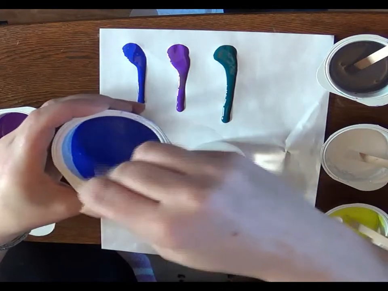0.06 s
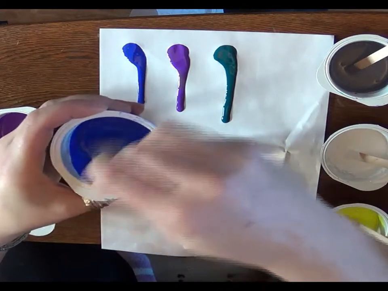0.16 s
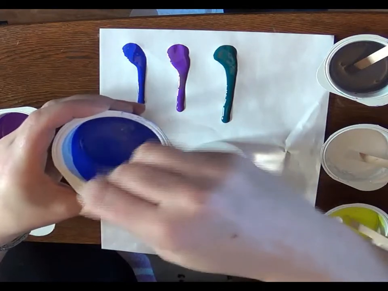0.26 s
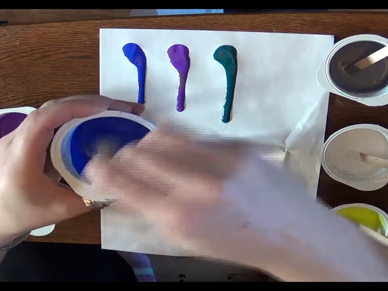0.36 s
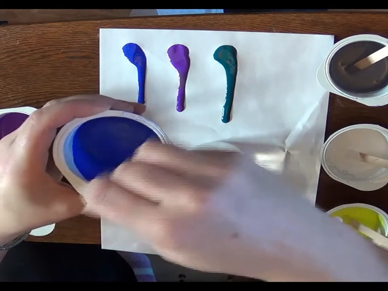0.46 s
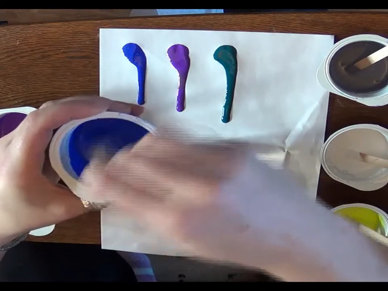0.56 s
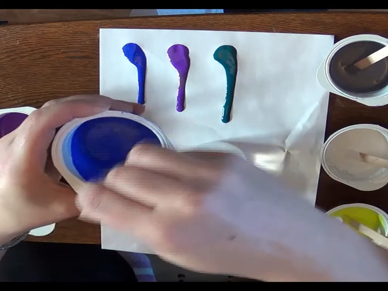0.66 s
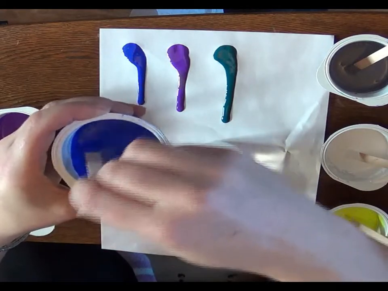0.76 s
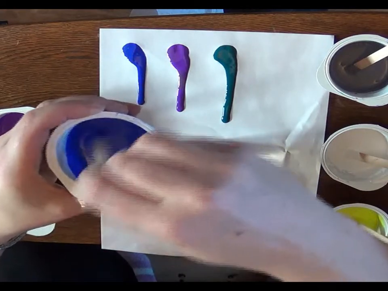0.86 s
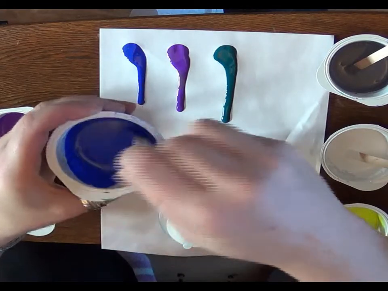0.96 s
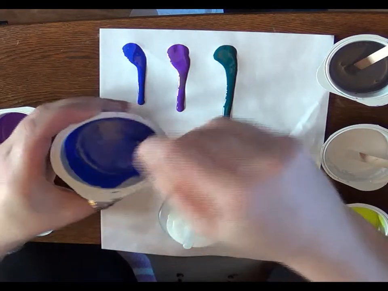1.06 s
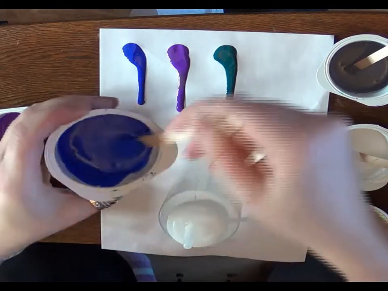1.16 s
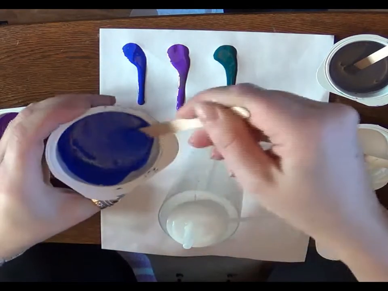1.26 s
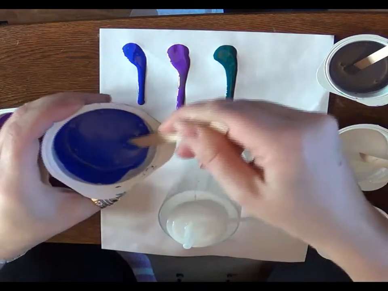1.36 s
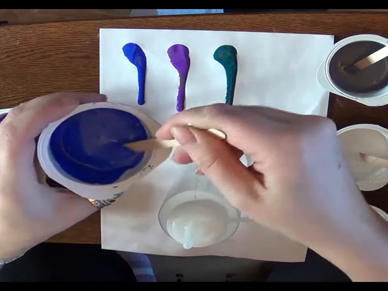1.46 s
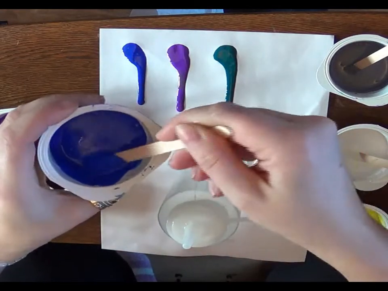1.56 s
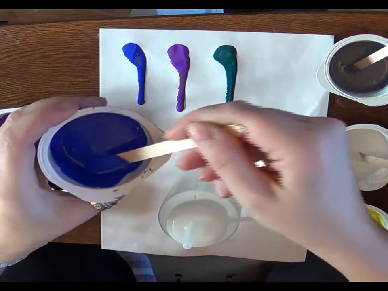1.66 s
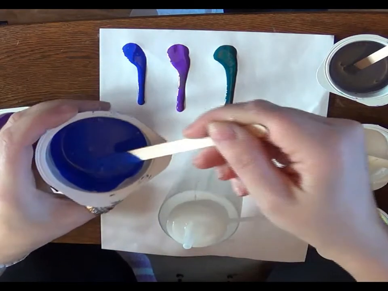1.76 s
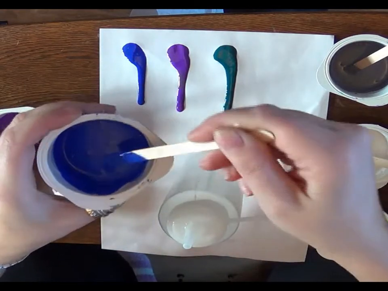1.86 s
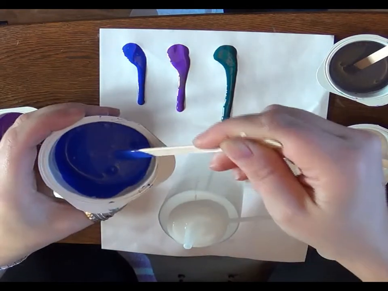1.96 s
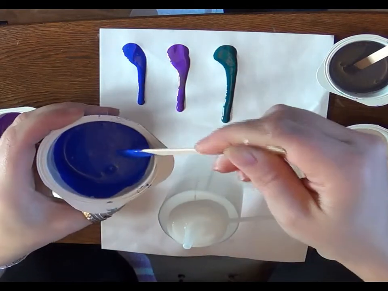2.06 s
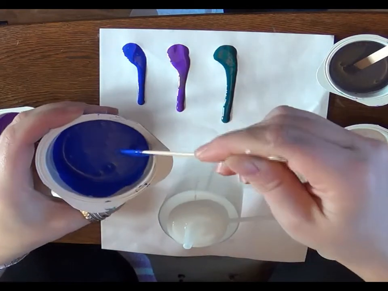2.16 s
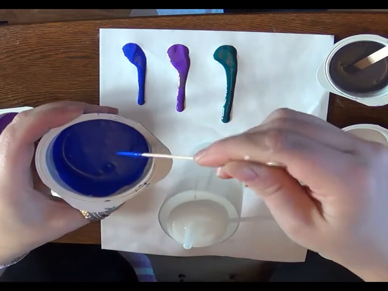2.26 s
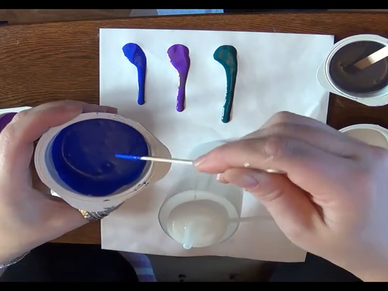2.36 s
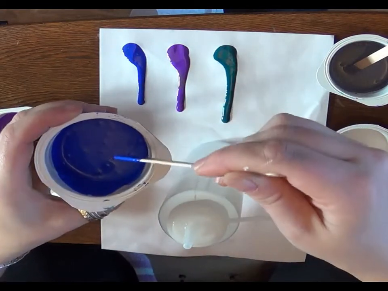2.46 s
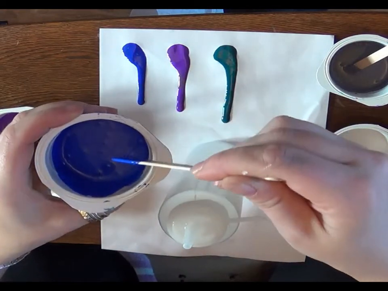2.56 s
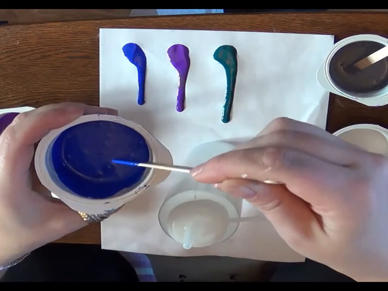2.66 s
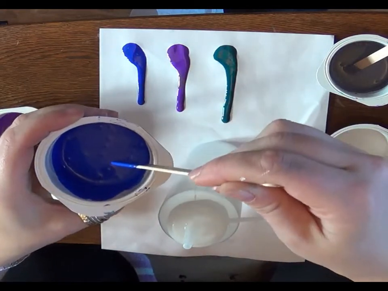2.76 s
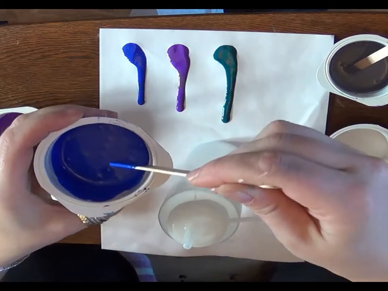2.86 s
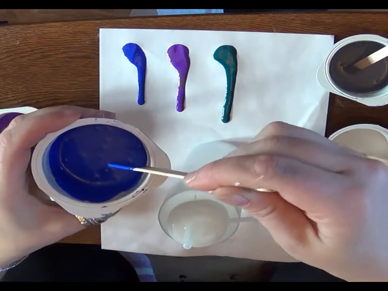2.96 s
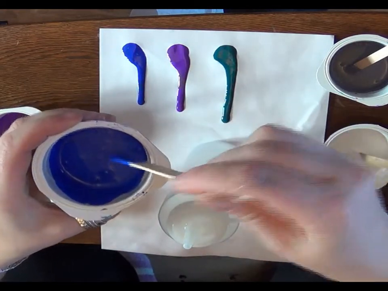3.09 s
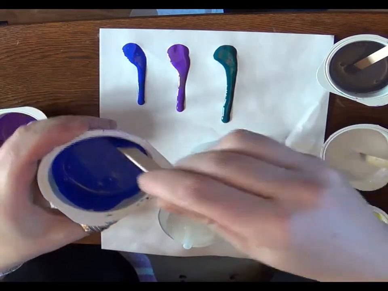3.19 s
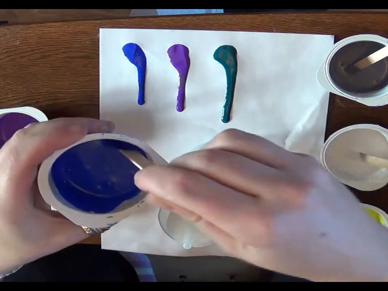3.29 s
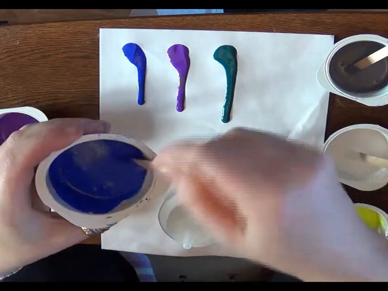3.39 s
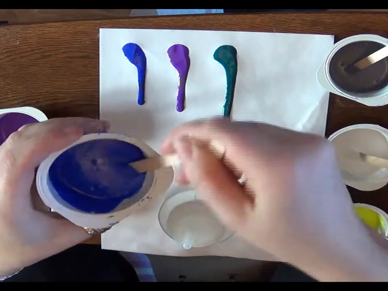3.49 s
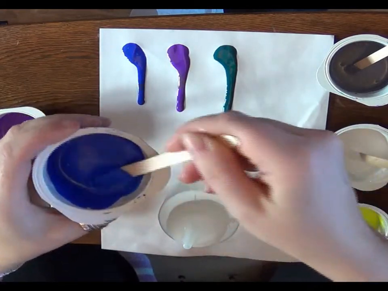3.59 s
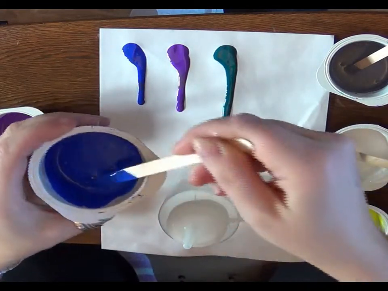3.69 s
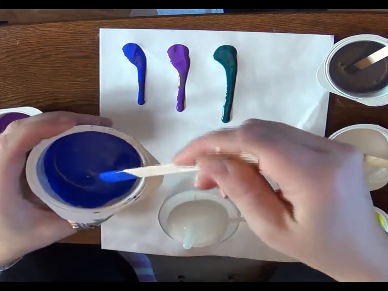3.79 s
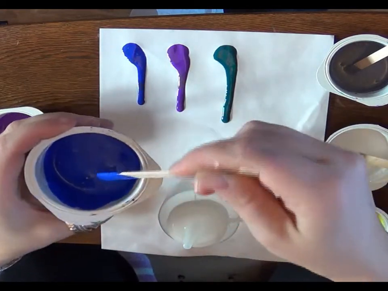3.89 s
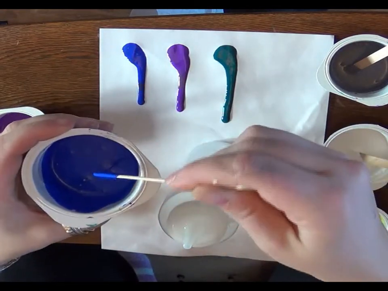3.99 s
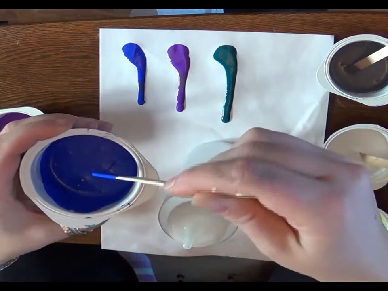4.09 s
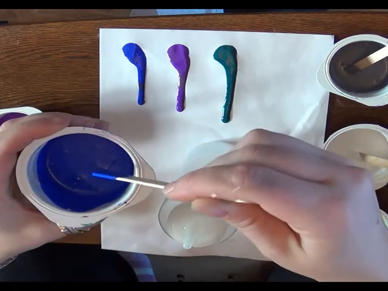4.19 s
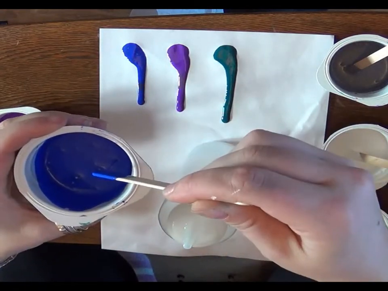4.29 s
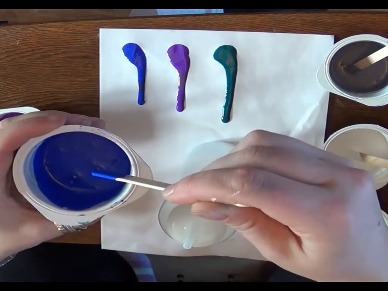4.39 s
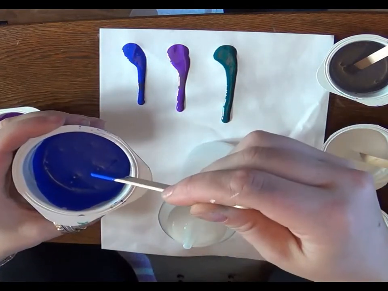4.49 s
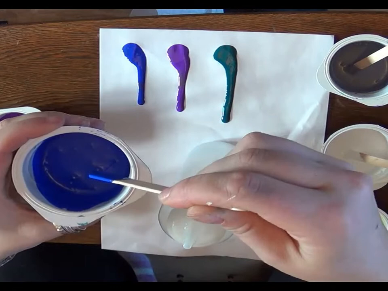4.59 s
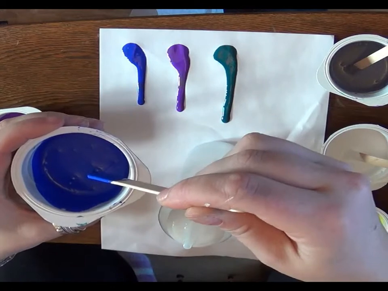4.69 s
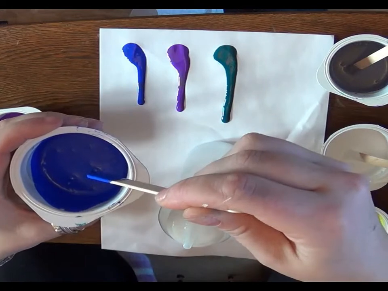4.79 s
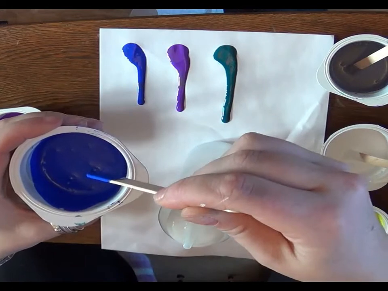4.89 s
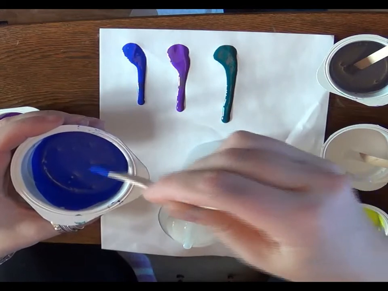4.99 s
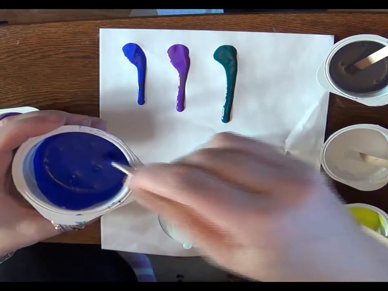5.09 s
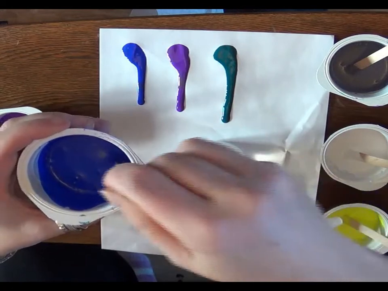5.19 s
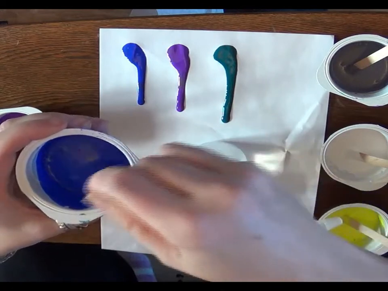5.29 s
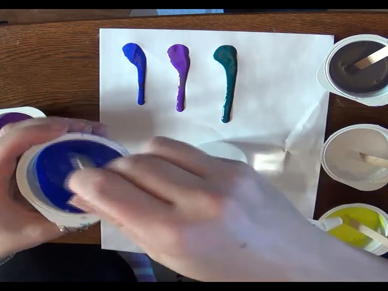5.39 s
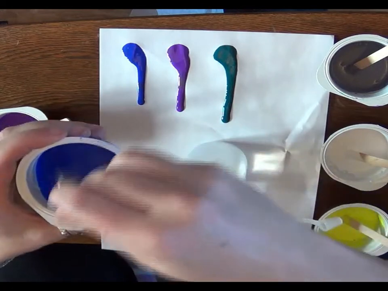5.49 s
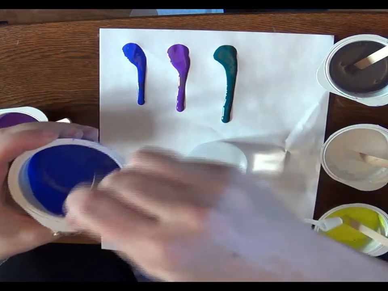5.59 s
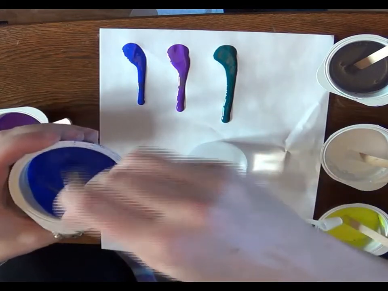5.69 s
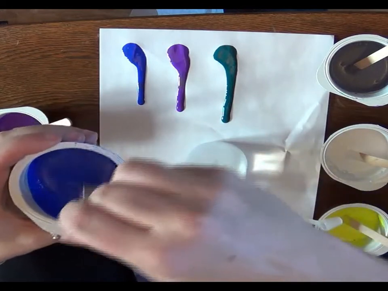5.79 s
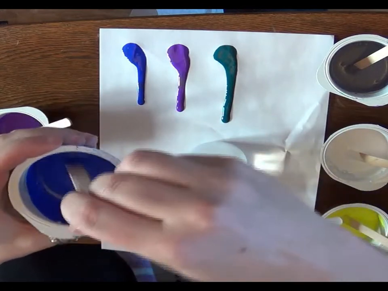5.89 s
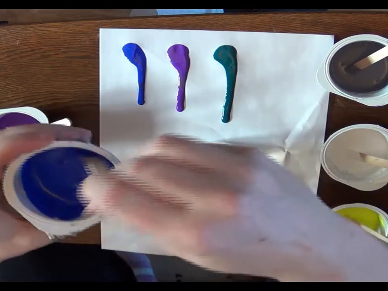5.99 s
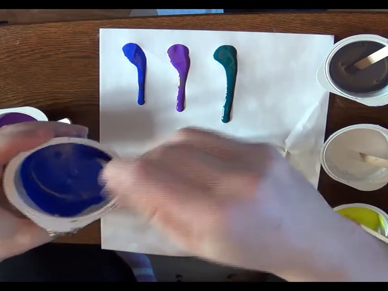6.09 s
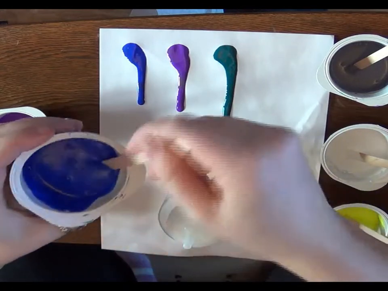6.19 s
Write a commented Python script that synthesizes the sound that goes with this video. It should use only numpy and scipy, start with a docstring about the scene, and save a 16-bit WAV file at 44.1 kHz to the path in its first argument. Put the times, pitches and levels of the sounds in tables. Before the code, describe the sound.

Close up in a small quiet room, a wooden stick rapidly stirs thin paint in a hand-held plastic pot, with raspy scrapes, hollow knocks and small wet glugs at the start. A sharp clap on the rim ends the main stirring, followed by a few soft scrapes. After a quiet pause comes a brief scrape, another pause, then fresh stirring to the end. Faint hiss, hum and a distant clock remain.

```python
"""A wooden stick stirs thin paint in a hand-held plastic pot: it scrapes, knocks the wall, and early glugs rise.
It claps once on the rim and rests, scrapes briefly, rests again, then stirs anew with a few late glugs.
Scrapes are random slips rung through pot and stick; knocks and the clap are noise bursts with decaying modes.
A moving resonance sings the wall's note, and a delayed, inverted bounce off the table colours the scraping.
All along, the small quiet room holds hiss, hum, a thin whine and a far clock made of decaying noise each second."""
import sys
import numpy as np
from scipy import signal
from scipy.fft import rfft, irfft, next_fast_len
from scipy.io import wavfile
from scipy.ndimage import uniform_filter1d, map_coordinates

SR = 44100
rng = np.random.default_rng(int(sys.argv[2]) if len(sys.argv) > 2 else 0)


def digitize_waveform(pressure):
    """Quantize a signal to 16-bit integers and store it at the path in sys.argv[1].

    Rows of a 2-D input are taken as channels; values are limited to [-1, 1].
    """
    field = np.atleast_2d(pressure).T
    bounded = np.clip(field, -1, 1)
    quanta = np.round(bounded * 32767).astype(np.int16)
    wavfile.write(sys.argv[1], SR, quanta)


N = 275625
TIME = np.arange(N) / SR
TOP_HZ = 15900
PAD = SR // 200  # 5 ms of silence at each end of a blow, where the filters settle

# lower edges of the four registers: pot bottom, pot wall, wood rasp, fine hiss [f/Hz]
BAND_EDGES = (70, 1100, 3200, 10500)
REGISTERS = [signal.butter(5, band, "band", fs=SR, output="sos")
             for band in zip(BAND_EDGES, BAND_EDGES[1:] + (TOP_HZ,))]


def undb(db):
    """Decibels to gain."""
    return 10 ** (np.asarray(db) / 20)


def unit(x):
    """Scale to rms 1."""
    return x / np.sqrt(np.mean(x ** 2))


def fade(t, t60):
    """Free decay by 60 dB in t60 seconds."""
    return np.exp(-np.log(1000) * t / t60)


def add(track, start, sound):
    """Mix a sound into a track from a given time on."""
    i = int(round(start * SR))
    lo, hi = max(i, 0), min(i + len(sound), N)
    track[lo:hi] += sound[lo - i:hi - i]


def colour(x, points):
    """Filter by a spectrum of (Hz, dB) points, joined along log frequency."""
    hz, db = np.transpose(points)
    size = next_fast_len(x.shape[-1])
    f = np.maximum(np.arange(size // 2 + 1) * SR / size, 1)
    gain = undb(np.interp(np.log(f), np.log(hz), db))
    return irfft(rfft(x, size) * gain, size)[..., :x.shape[-1]]


def registers(x):
    """Split into pot bottom, pot wall, wood rasp and fine hiss, each of rms 1."""
    return [unit(signal.sosfilt(sos, x)) for sos in REGISTERS]


def walk(size, rate):
    """Smooth random wander with a spread near 1, heading for a new value `rate` times a second."""
    k = int(SR / rate)
    steps = np.repeat(rng.standard_normal(size // k + 1), k)
    return unit(uniform_filter1d(steps, k))[:size]


def scraping():
    """All strokes of the stick along the wall, with their bounce off the table."""
    # strokes along the wall [start t/s, length t/s, rasp level before pressure/dB, swell from start to end/dB,
    # pot wall over rasp/dB, fine hiss over rasp/dB, wall note over the rest of the wall's ring/dB]
    strokes = [(0, 0.048, -34, -21.5, -5, -5.5, -12), (0.029, 0.014, -30, -4, -6, -8, -10),
               (0.048, 0.034, -37.5, 0, 0, -8, -14), (0.08, 0.081, -33, 0, -8, -7, -3),
               (0.168, 0.048, -38, 5, -5, -5, -5), (.203, 0.027, -32.5, -2, -6, -7, -8),
               (0.236, 0.041, -34.5, 5, -10, -11, 1), (0.279, 0.05, -32.5, 4, -12.5, -5, 1),
               (0.332, 0.05, -38.5, -12, -8.5, -6, -2), (0.375, 0.025, -36, 9.5, -9, -4, -4),
               (0.409, 0.034, -39.5, 9, -7.5, -11, -3), (0.445, 0.012, -31.5, 3, -8, -8, 0),
               (0.477, 0.059, -32, -1.5, -8.5, -6.5, -8), (0.533, 0.042, -39.5, 12, -11.5, -7, -8),
               (0.63, 0.043, -39, -8, -8, -9, -10), (0.673, 0.085, -35, -8, -10.5, -5, -6),
               (0.772, 0.033, -32, -8, -5, -11, -11), (0.829, 0.031, -34, -2, -10.5, -12, 9),
               (0.928, 0.18, -37, -2, -9, -6, -8), (0.957, 0.046, -40.5, -1, -18, -8, -3),
               (1.114, 0.052, -36.5, -9, -6, -14, -12), (1.188, 0.03, -40, 7, -6.5, -14, -5),
               (1.317, 0.054, -46.5, -3, -5, -19, -6), (1.368, 0.039, -34.3, 13, -5, -20, -3),
               (1.413, 0.098, -41.5, -17, -7.5, -15, -6), (1.533, 0.077, -47.5, -1, -4.5, -8, -8),
               (3.308, 0.12, -42, 9, -7, -3, 1), (3.438, 0.045, -38, -2, -1, -6, 4),
               (3.479, 0.069, -37.8, 0, -7, -10, -6), (3.549, 0.082, -40, 0.5, -5.5, -8, -7),
               (5.179, 0.039, -37.5, 9.5, -4, -23, -11), (5.221, 0.052, -38, -6, -6, -16, -11),
               (5.275, 0.022, -36.3, 4, -2.5, -13, -24), (5.298, 0.11, -39, -2, -8, -12, -7),
               (5.428, .047, -43, 14, -0.5, -12, 4), (5.548, 0.056, -37.5, 2.5, -8.5, -2, -7),
               (5.606, 0.035, -35, -5, -9.5, -5.5, -9), (5.649, 0.081, -43.5, -2, -6, -6.5, -13),
               (5.743, 0.073, -37.5, 6, -10, -7, -3), (5.824, 0.034, -33.5, 14.5, -16.5, -3.5, 6),
               (5.876, 0.022, -35.5, -2, -5.5, -10, -7), (6.043, 0.12, -41.5, 0.5, -1.5, -6.5, -1),
               (6.148, 0.02, -37.5, -3, -5, -4, -6), (6.162, 0.011, -32.5, -0.5, -6, -15, -2),
               (6.179, 0.016, -33.5, -3, -2.5, -8, 1), (6.199, 0.029, -34.3, -3, -4.5, -12, -6),
               (6.232, .018, -34.5, -7, -4, -14, 1)]
    out = np.zeros(N)
    for start, *shape in strokes:
        add(out, start, stroke(start, *shape))
    return table_bounce(out)


def stroke(start, length, rasp_db, swell_db, ring_db, hiss_db, note_db, slip_rate=9000, chatter_rate=170,
           chatter_db=0.6, pressed_t60=0.014, direct_db=29, stick_db=7, stick_t60=0.0055, note_width_hz=160,
           waver=.022, waver_rate=25, bottom_db=-17, even_hiss_db=-5, tilt=0.2):
    """Wood fibres catch and let go thousands of times a second while the pressure swells and eases."""
    # colour of the slips of wood on wet plastic [f/Hz, level/dB]
    slip_colour = [(80, 12), (200, 4.5), (400, -0.5), (700, 2.5), (1000, 4), (1500, 3.5), (2300, 1),
                   (3000, 2.5), (3450, -1.5), (3900, 3), (4600, 2.5), (5100, 2.5), (7000, 2.5), (10000, 3),
                   (13000, 6), (14200, 2), (16000, -4)]
    # note of the rubbed wall, lower as the stick is lifted; one curve per spell of stirring [t/s, f/Hz]
    wall_pitch = [
        [(0.0, 2340), (0.9, 2300), (1.34, 2060), (1.4, 1640), (1.46, 2280)],
        [(3.32, 2250), (3.475, 2180), (3.51, 1910), (3.62, 1760)],
        [(5.19, 2370), (5.75, 2270), (6.06, 2150), (6.24, 2260)],
    ]
    t = TIME[:SR // 4]
    slips = (rng.random(len(t)) < slip_rate / SR) * np.sign(rng.standard_normal(len(t)))
    slips = colour(slips * undb(chatter_db * walk(len(t), chatter_rate)), slip_colour)

    lag = TIME[:SR // 30]
    body = pot_ring(lag, detune=0.012, scatter_db=1.0) * fade(lag, pressed_t60)  # the pressing stick damps the pot
    body[0] += undb(direct_db)  # part of each slip radiates straight from the contact
    rung = signal.fftconvolve(slips, body)[:len(t)]
    rung = rung + undb(stick_db) * sliding_wood(slips, stick_t60)
    rung = colour(rung, [(3500, 0), (11000, 2 * tilt * (hiss_db - even_hiss_db))])  # wet wood is duller
    bottom, wall, rasp, hiss = registers(rung)

    # the wall sings at the height of the contact; the pitch wavers as the contact travels round the pot
    note_hz = np.interp(start + t, *np.vstack(wall_pitch).T) * (1 + waver * walk(len(t), waver_rate))
    note = unit(signal.sosfilt(REGISTERS[1], resonate(slips, note_hz, note_width_hz)))
    wall = unit(wall_colour(wall, belly_db=-7.0, upper_db=0) + undb(note_db) * note)
    mix = undb(bottom_db) * bottom + undb(ring_db) * wall + rasp + undb(hiss_db) * hiss
    return undb(rasp_db) * pressure(t, length, swell_db) * mix


def pressure(t, length, swell_db, grip_s=0.007, let_go_s=0.0085, arch_db=1, tremor_db=0.8, tremor_rate=71):
    """The stick grips, drags with a force that arches as it grows or fades, and lets go."""
    grip = np.clip(t / grip_s, 0, 1)
    along = np.minimum(t / length, 1)
    swell = swell_db * (along - .5)
    arch = arch_db * (np.sin(np.pi * along) - 2 / np.pi)  # hardest in the middle
    tremor = tremor_db * walk(len(t), tremor_rate)  # the hand's pressure changes
    release = np.exp(-np.maximum(t - length, 0) / let_go_s)
    return grip * undb(swell + arch + tremor) * release


def pot_ring(t, detune, scatter_db, supple_hz=6000):
    """The pot's answer to one tap; the place of contact weights its modes and shifts the high ones most."""
    # modes of pot and stick, damped by hand and paint [nominal f/Hz, t60/s, level/dB]
    pot_modes = [(450, 0.023, -13), (611, 0.033, -9), (808, 0.015, -7.5), (1178, 0.037, -2),
                 (1374, 0.015, -3), (1665, 0.035, -22), (1918, 0.024, -2.5), (2283, 0.027, -1),
                 (2480, 0.014, -9.5), (2880, 0.023, -13.5), (3740, 0.0066, -6), (4140, 0.039, -6),
                 (4480, 0.018, -5.5), (5450, 0.017, -5), (6200, 0.02, -6.5), (6680, 0.04, -11),
                 (7300, 0.022, -5), (8370, 0.021, -7), (9340, 0.038, -7), (12900, 0.004, 10.5)]
    hz, t60, db = np.transpose(pot_modes)[:, :, None]
    shift, weight, phase = rng.standard_normal((3, len(pot_modes), 1))
    hz = hz * (1 + detune * shift * np.minimum(hz / supple_hz, 1))
    modes = fade(t, t60) * np.sin(2 * np.pi * (hz * t + phase))
    return np.sum(undb(db + scatter_db * weight) * modes, axis=0)


def sliding_wood(slips, t60, count=6, slide_rate=45):
    """The stick's dense modes blend from spot to spot as the contact slides, so the colour keeps shifting."""
    lag = TIME[:SR // 100]
    spots = rng.standard_normal((count, len(lag))) * fade(lag, t60)
    share = np.array([walk(len(slips), slide_rate) for _ in spots])
    rung = signal.fftconvolve(slips[None], spots, axes=1)[:, :len(slips)]
    return np.sum(share * rung, axis=0) / np.linalg.norm(share, axis=0)


def resonate(x, hz, width_hz):
    """One resonance whose pitch may move: shift the sound down to 0 Hz, smooth it, shift it back."""
    turn = np.exp(2j * np.pi * np.cumsum(hz) / SR)
    smooth = signal.lfilter([1], [1, -np.exp(-np.pi * width_hz / SR)], x / turn)
    return np.real(turn * smooth)


def wall_colour(x, belly_db, upper_db):
    """The wall is soft at the belly, stiff near the rim; the contact's height weights its low and high modes."""
    return unit(colour(x, [(1400, belly_db), (1650, 0), (2450, 0), (3200, upper_db)]))


def table_bounce(x, sway_rate=9):
    """The pot's underside sounds in opposite phase and returns from the table; the comb shifts with the hands."""
    # bounce off the table [t/s, lag/ms, strength 0-1, sway of the lag/ms]
    bounce = [(0.0, .85, .16, .12), (1.1, .82, .18, .1), (1.5, 1.12, .18, .04), (3.3, 1.17, .22, .01),
              (3.63, 1.155, .22, .015), (5.2, 1.2, .18, .05), (6.2, 1.1, .16, .12)]
    s, lag_ms, strength, sway_ms = np.transpose(bounce)
    sway = np.interp(TIME, s, sway_ms) * walk(N, sway_rate)
    lag_s = (np.interp(TIME, s, lag_ms) + sway) / 1000
    gain = np.interp(TIME, s, strength)
    returned = map_coordinates(x, [(TIME - lag_s) * SR], order=3)
    return (x - gain * returned) / np.sqrt(1 + gain ** 2)


def knocking(crack_t60=0.028, crack_db=5, snap_t60=0.0039, snap_db=15, hiss_db=-17, touch_s=0.00015,
             top_db=-4, dulling=0.63, spot_db=-3, spot_t60=0.035):
    """The stick meets the wall: a snap, a short crack, the ring of the pot and the note of the struck spot."""
    # knocks on the pot [t/s, wall level over 10 ms/dB, cushioning by paint/dB, pitch of the struck spot f/Hz,
    # belly modes/dB, bottom thump over wall/dB]
    knocks = [(.018, -38, 9, 1520, 20, 6), (.072, -33.5, 10, 2305, -7, -21),
              (0.1817, -34, 5.5, 1384, 2, -9), (0.284, -38.5, -2, 1286, -7, -4),
              (.3, -37, 6, 2300, -17, -13), (0.3703, -33.5, 2, 1890, 6, -8),
              (0.4247, -37.5, 8, 1830, -2, -9), (0.456, -43, -3, 2280, -6, -10),
              (.468, -40, 10, 2300, 0, -5.5), (0.6258, -32, 0, 2420, -1, -9),
              (0.6777, -44, -6, 2230, -5, -14), (0.764, -32, 3, 1400, 4, -11.5),
              (.871, -29.5, 0, 2287, -5, -7.5), (0.9647, -40, -9.5, 2260, -10, -30),
              (1.431, -38.5, 15, 2150, 8, -10), (1.5127, -41, 10, 2270, -18, -13),
              (1.613, -46.5, 2, 2150, -16, -19), (3.3005, -40.5, -0.5, 2160, 6, -11),
              (3.601, -39.5, 6, 1760, -14, -26), (5.179, -47, -6, 1240, 6, 2.5),
              (5.309, -44, 10, 1360, 6, -11), (5.5686, -33.5, 8, 1430, 3, -11),
              (5.607, -48.5, -13.5, 2460, -8, -25), (5.7575, -36.5, 7, 2220, 10, -14),
              (5.9944, -54.5, -23, 2560, -12, -27), (6.01, -33.5, 8, 2170, -12, -10),
              (6.045, -45, 8, 2000, -13, -4), (6.07, -41, 8, 2240, -13, -13),
              (6.124, -41, 10, 1970, -2, -8)]
    # colour of a knock; the pot's bottom gives the weight [f/Hz, level/dB]
    knock_colour = [(120, -15), (400, 3.5), (620, 1.5), (820, 7), (1030, -4.5), (1400, 5), (3500, 5.5)]
    out, t = np.zeros(N), TIME[:SR // 10]
    for s, wall_db, cushion_db, spot_hz, belly_db, thump_db in knocks:
        wood_db = wall_db - cushion_db  # paint cushions some knocks: they start softly and lose their top
        contact = 1 - np.exp(-t / (touch_s * undb(cushion_db)))
        burst = undb(crack_db) * fade(t, crack_t60) + undb(snap_db) * fade(t, snap_t60)
        crack = rng.standard_normal(len(t)) * burst
        blow = contact * (crack + pot_ring(t, detune=0.053, scatter_db=2.0))
        blow = colour(np.pad(blow, PAD), [*knock_colour, (11000, top_db - dulling * cushion_db)])
        bottom, wall, wood, hiss = registers(blow)

        spot = np.pad(contact * fade(t, spot_t60) * np.sin(2 * np.pi * spot_hz * t), PAD)
        wall = unit(wall_colour(wall, belly_db, upper_db=-2.5) + undb(spot_db) * unit(spot))
        dulled_hiss_db = wood_db + hiss_db - dulling * max(cushion_db, 0)
        levels = undb([wall_db + thump_db, wall_db, wood_db, dulled_hiss_db])
        knock = levels @ [bottom, wall, wood, hiss]
        add(out, s - 1 / 200, knock * np.sqrt(SR / 100 / len(blow)))  # levels refer to 10 ms
    return out


def rim_tap(start=1.3083, level_db=-18.5, clap_db=22, clap_lag_s=.0003, crack_db=5, crack_t60=.02):
    """The stick's edge touches, its flat claps down just after, and the stiff rim cracks and rings briefly."""
    # modes of the rim [f/Hz, t60/s, level/dB]
    rim_modes = [(1965, 0.025, -1.5), (2267, 0.033, -6.5), (2940, 0.026, -8.5), (4050, .025, -11),
                 (5400, 0.018, -5), (7060, .03, -15), (8560, .03, -8)]
    # colour of the clap [f/Hz, level/dB]
    clap_colour = [(300, -17), (1100, -18), (1500, -5), (1850, 3.5), (2800, 5), (3400, -4), (4100, 0),
                   (5200, 0), (8000, -5.5), (10500, -9), (14000, -19), (16000, -34)]
    out, t = np.zeros(N), TIME[:SR // 10]
    hz, t60, db = np.transpose(rim_modes)[:, :, None]
    ring = np.sum(undb(db) * fade(t, t60) * np.sin(2 * np.pi * hz * t), axis=0)
    crack = np.sign(rng.standard_normal(len(t))) * fade(t, crack_t60)
    blow = ring + undb(crack_db) * crack
    blow[int(clap_lag_s * SR)] += undb(clap_db)
    blow = unit(colour(np.pad(blow, PAD), clap_colour))
    add(out, start - 1 / 200, undb(level_db) * blow * np.sqrt(SR / 100 / len(blow)))  # level refers to 10 ms
    return out


def glugging(glide=0.21, onset_s=0.0016):
    """Each air pocket closing in the paint rings briefly and rises in pitch as it shrinks."""
    # air pockets [t/s, starting f/Hz, level before the soft onset/dB, t60/s]
    glugs = [(.018, 857, -27, 0.037), (.019, 644, -30, 0.035), (0.019, 431, -31, 0.058),
             (.872, 645, -35, 0.053), (5.886, 172, -31, 0.023), (6.051, 263, -34, 0.024),
             (6.122, 293, -38, 0.064)]
    out, t = np.zeros(N), TIME[:SR // 8]
    for s, hz, db, t60 in glugs:
        envelope = (1 - np.exp(-t / onset_s)) * fade(t, t60)
        rising = np.sin(2 * np.pi * hz * t * (1 + glide * t / t60))
        add(out, s, undb(db) * envelope * rising)
    return out


def room(x, t60=0.45, wet_db=-14.5, early_db=-17, early_t60=0.12, gap_s=0.00089):
    """Quick reflections from the table and a longer tail from the walls: decaying noise, unlike on the two sides."""
    t = TIME[:SR // 2]
    early, tail = rng.standard_normal((2, 2, len(t))) * (t > gap_s)
    echo = undb(early_db) * unit(early * fade(t, early_t60)) + undb(wet_db) * unit(tail * fade(t, t60))
    echo = colour(echo / np.sqrt(len(t)), [(100, 2.9), (300, 13.7), (600, 8.0), (2000, 7.4),
                                           (5000, 1.8), (9000, 3.4), (14000, 3)])
    return signal.fftconvolve(x[None], echo, axes=1)[:, :N]


def clock(step_s=.756, tick_db=-49, latch_db=-7, latch_lead_s=0.023, tail_t60=0.47):
    """A far clock: the latch lifts, then the hand steps; long noise decays stand for its echo in the room."""
    step = (TIME - step_s) % 1
    latch = (TIME - step_s + latch_lead_s) % 1
    swell = fade(step, tail_t60) + undb(latch_db) * fade(latch, tail_t60)
    noise = rng.standard_normal(N) + rng.standard_normal((2, N))  # partly shared by the two sides
    noise = colour(noise, [(200, 3), (800, -5.5), (1800, 5.0), (4000, 1.0), (6000, -11), (12000, -19)])
    return undb(tick_db) * swell * unit(noise)


def background(air_db=-50.5, whine_hz=15625, whine_db=-63):
    """Even hiss and rumble of still air, with the steady sines of a low hum and a thin electronic whine."""
    # still air of the room [f/Hz, relative level per Hz/dB]
    air = [(12, -41), (20, -4.5), (87, -2), (178, -3), (210, -7.5), (234, -4.5), (418, -6), (567, -7.5),
           (812, -9), (1230, -10.5), (2080, -9.5), (3240, -13.5), (8510, -13.5), (14800, -18.5)]
    # how much of the air is side [f/Hz, side minus mid level/dB]
    air_side = [(30, -8), (70, -19), (130, -12), (250, -7), (500, -1.5), (1000, 1.5), (2400, -2.5),
                (4400, -4), (8000, -11), (15000, -14.5)]
    # low hum of appliances [f/Hz, rms level/dB]
    hum = [(76, -67), (100, -73), (209, -68)]
    mid, side = (undb(air_db) * unit(colour(rng.standard_normal(N), air)) for _ in range(2))
    side = colour(side, air_side)
    tones = np.zeros(N)
    for hz, db in [*hum, (whine_hz, whine_db)]:
        tones += np.sqrt(2) * undb(db) * np.sin(2 * np.pi * (hz * TIME + rng.random()))
    return mid + tones + np.array([side, -side])


def scene():
    """The pot is close and central; the room lies around it."""
    pot = scraping() + knocking() + rim_tap() + glugging()
    return pot + room(pot) + clock() + background()


def record(dry):
    """A steep low-pass cuts the top."""
    return signal.sosfilt(signal.ellip(10, .1, 80, TOP_HZ, fs=SR, output="sos"), dry)


dry = scene()
out = record(dry)
digitize_waveform(out)
```